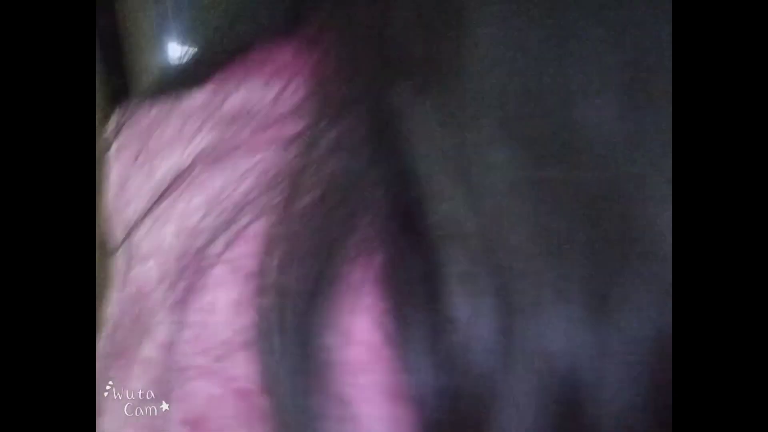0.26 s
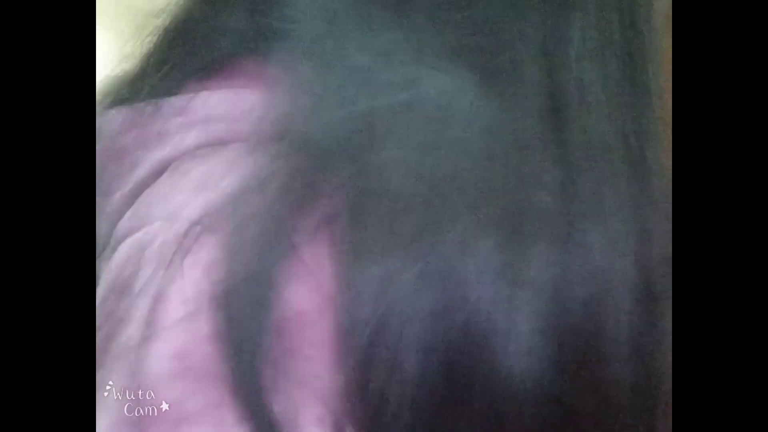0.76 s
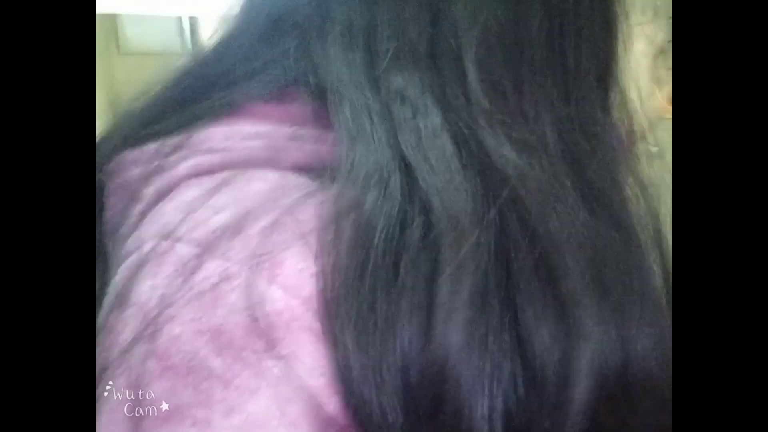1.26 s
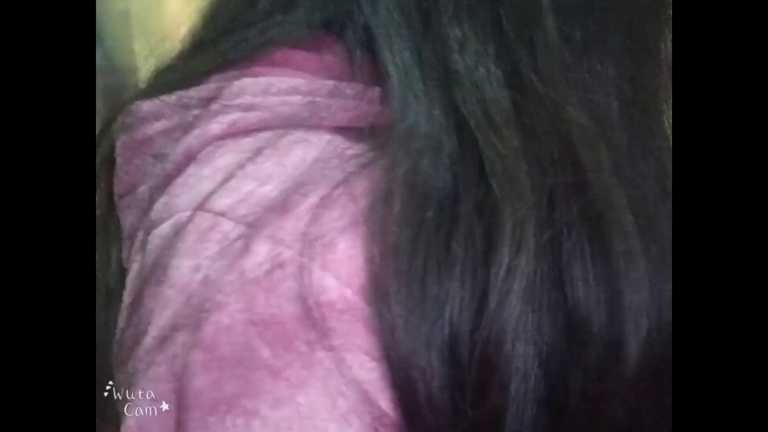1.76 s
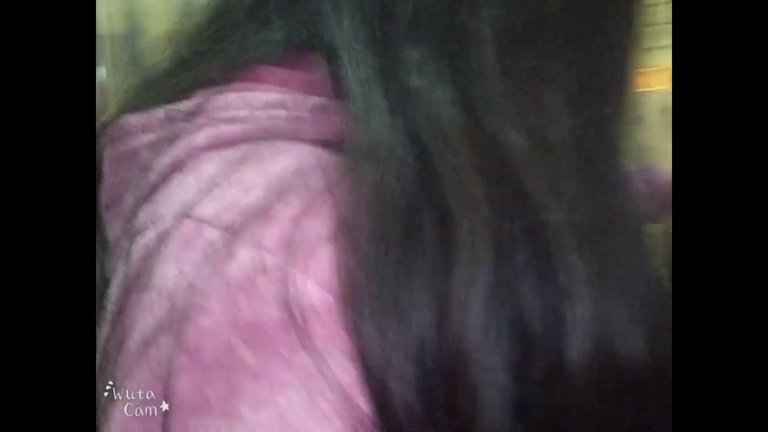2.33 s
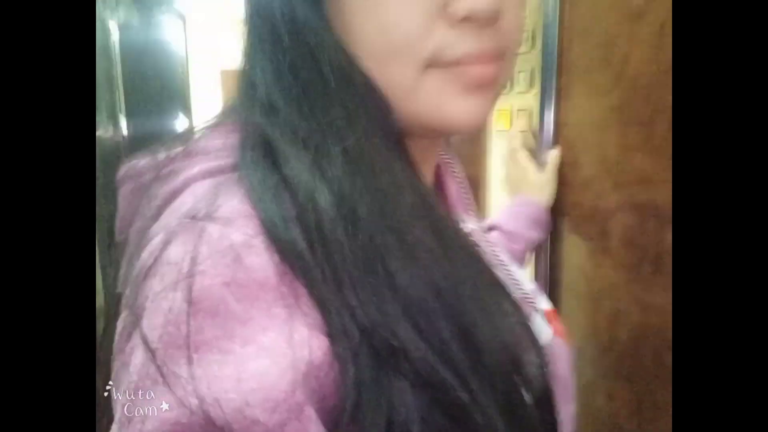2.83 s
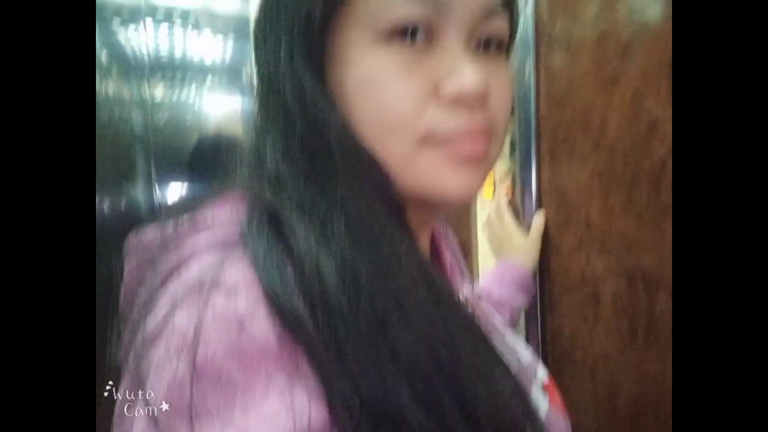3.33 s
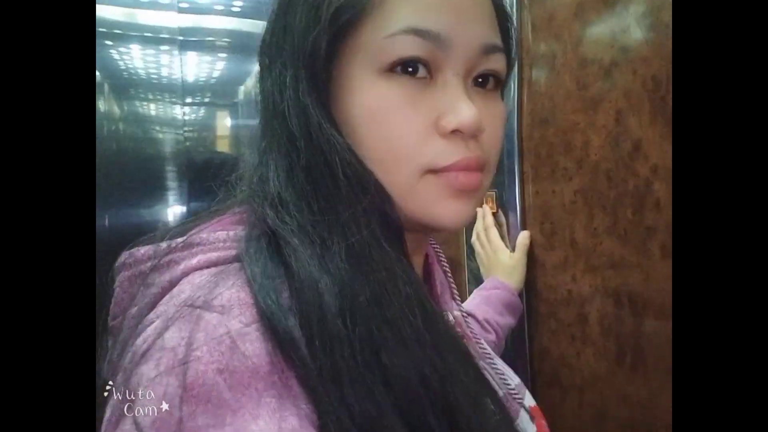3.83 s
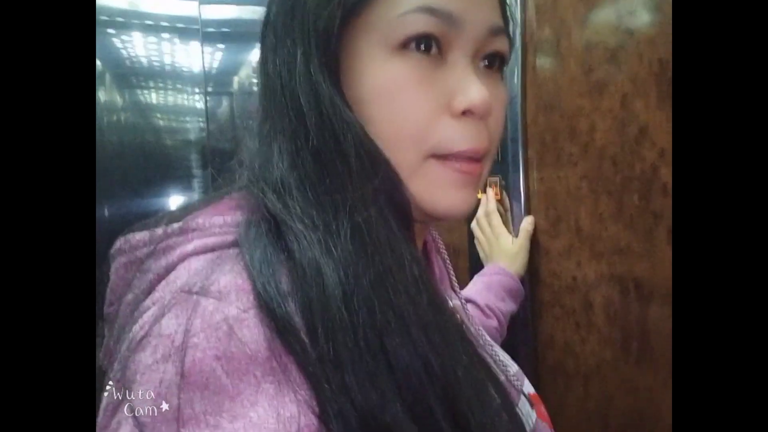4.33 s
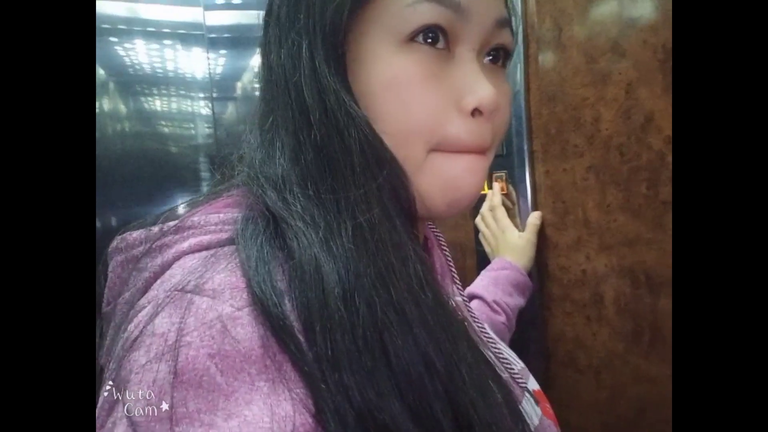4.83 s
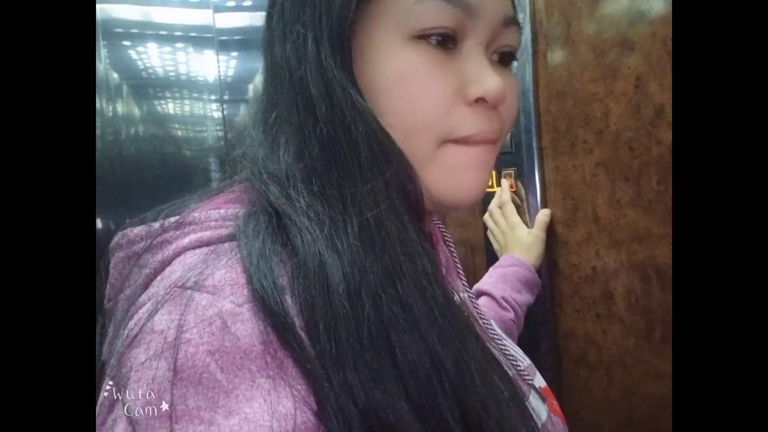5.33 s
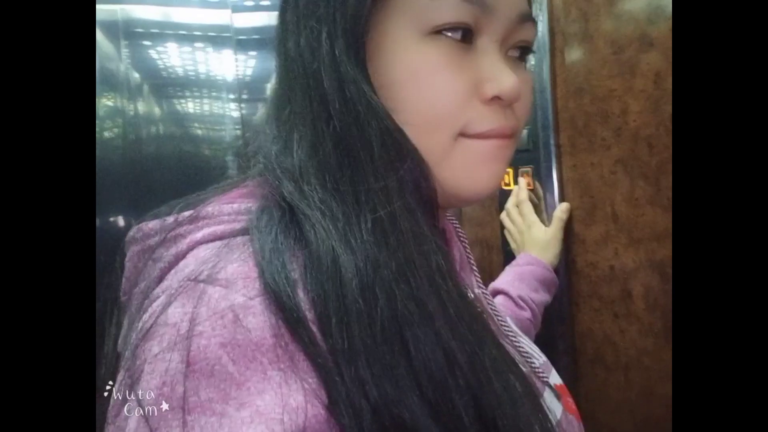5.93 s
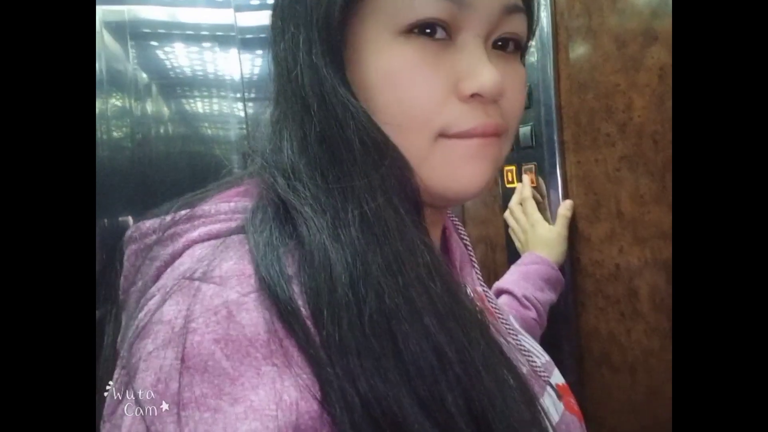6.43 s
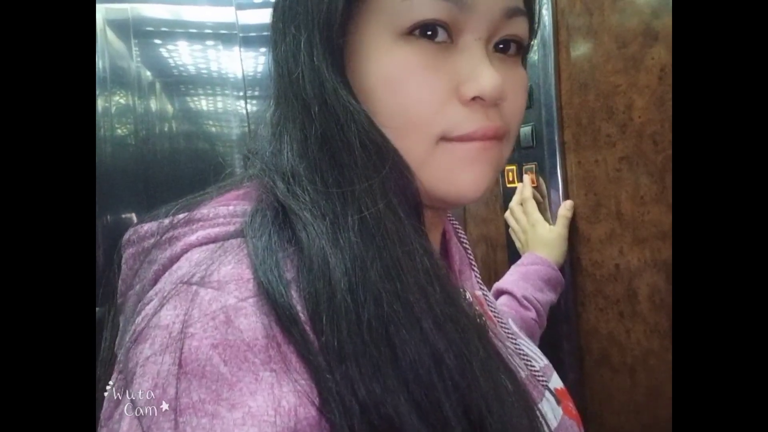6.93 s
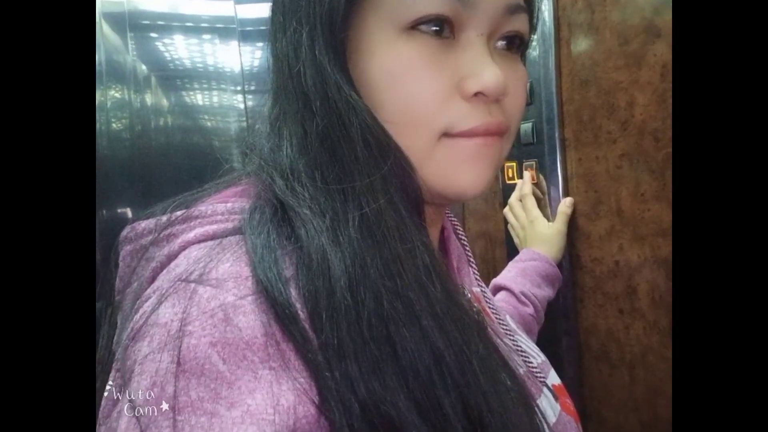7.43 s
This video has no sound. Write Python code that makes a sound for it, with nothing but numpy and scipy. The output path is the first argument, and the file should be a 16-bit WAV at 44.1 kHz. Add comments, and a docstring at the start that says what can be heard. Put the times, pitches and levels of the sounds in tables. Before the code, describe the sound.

A hand-held phone inside a small steel lift car picks up a steady low hum and a pitched fan drone with blown air, slightly muffled at first and clearer after about 2 to 3.5 seconds. From 0 to 2 seconds, fine clothing rustle sits close to the microphone, with short surges of air, scuffs and clicks; boomy knocks ring the wall panels at about 0.2, 0.65, 1.27 and, as a sharp double, 1.76 to 1.82. A light tap follows at 2.15. Shaft air rushes and swells, peaking near 3.5, with small clicks around 3.4 to 3.7, a soft low thud near 4 and scuffs at 4.3. At 4.73, 4.91 and 5.06 three juddering scrapes shove along the car, groaning and gritty, the last brightly hissing and leaving hollow resonance. By 6 the rush has faded; hum and fan continue, with a faint deep knock at 6.95, until about 7.7.

```python
"""A mains hum and a seven-blade ceiling fan drone inside a small steel lift car, through a hand-held phone.
Shaped noise makes the shaft air rush and surge and clothing rustle; short noise bursts click and tap,
and decaying sines knock and boom. Near five seconds layered friction noise scrapes along the car in three
shoves, the last with a bright hiss; then hum and fan carry on, with one last faint knock."""
import sys
import numpy as np
from scipy import signal
from scipy.fft import rfft, irfft, next_fast_len
from scipy.io import wavfile
from scipy.ndimage import uniform_filter1d, minimum_filter1d

SR = 44100
rng = np.random.default_rng(int(sys.argv[2]) if len(sys.argv) > 2 else 0)


def master(y):
    """Save y as 16-bit WAV."""
    cut = np.clip(np.atleast_2d(y).T, -1, 1)
    pcm = np.round(cut * 32767)  # scale
    wavfile.write(sys.argv[1], SR, pcm.astype(np.int16))


N = 338247
T = np.arange(N) / SR  # time in s

# All source levels are ahead of the phone's gain; colour tables give relative noise density.
# mains hum level over time: time_s, level_db
HUM_LEVEL = [(0.0, -33), (0.15, -39.5), (1.83, -27.5), (2.6, -33), (3.87, -28.5), (5.26, -33),
             (7.67, -31.5)]
# steady fan lines: multiple_of_shaft_rate, level_db
FAN_LINES = [(4, -51), (6, -40.5), (8, -61), (12, -57), (21, -65.5), (27, -63.5)]
# level of the blade tone's octave over time: time_s, level_db
OCTAVE_LEVEL = [(0.0, -67), (0.66, -65), (0.81, -46.5), (2.16, -62), (3.5, -45), (4.34, -46.5), (4.76, -41),
                (5.98, -42.5), (7.67, -42)]
# air blown by the fan, with the phone's treble hole near 10 kHz: freq_hz, density_db (per Hz)
FAN_AIR_COLOUR = [(30, 0.5), (48, 8.5), (70, 6), (130, -2.5), (205, -2), (400, -2), (680, -9),
                  (1050, -10.5), (1800, -16), (2200, -18), (4400, -22), (7000, -31), (10000, -59),
                  (15000, -25.5)]
# whirr of the fan: freq_hz, density_db (per Hz)
WHIRR_COLOUR = [(150, -45), (400, -2), (520, 2.5), (660, 4.5), (800, -3.5), (1080, 0), (1400, -40),
                (3000, -25), (8000, -41.5)]
# air resonances of the car: centre_hz, width_hz, lift_db
CAR_RESONANCES = [(94.3, 37, 6.5), (165, 23, 11), (255, 28, 6), (296.4, 19.7, 12), (445, 35, 1),
                  (665, 24, 4.5), (874, 12.7, 10.5), (954, 18, 5), (1146, 8.6, 8.5), (1600, 28, 4),
                  (1790, 67, -8.5), (2245, 210, 5.5), (2480, 95, 2.5), (3430, 510, 2.5), (4250, 200, 3)]
# surges of air in the shaft: peak_s, level_db, fall_s (time to fall by 1/e)
SURGES = [(.03, -34, 0.11), (.24, -37.5, 0.11), (.67, -30.5, 0.11), (2.1, -41, 0.21), (3.12, -27, 0.31),
          (3.541, -23, 0.27), (3.91, -28.5, 0.14), (4.31, -29.5, .12), (5.02, -27.5, 0.2)]
# rush of shaft air: freq_hz, density_db (per Hz)
RUSH_COLOUR = [(30, -30), (65, 4.5), (150, 0), (205, -8), (330, -1), (470, 0), (680, -4), (850, -10.5),
               (1200, -16), (1900, -27), (4000, -40.5), (8000, -47), (15000, -41)]
# low shake of the car in the air: freq_hz, density_db (per Hz)
BUFFET_COLOUR = [(25, -23), (45, -4), (65, 3), (90, -1), (140, -20), (400, -69)]
# rustle levels either side of a brief dip by the phone's noise suppression:
# start_s, end_s, start_level_db, trend_db_per_s
RUSTLE_LEVELS = [(0, 1.65, -48.5, -4.5), (1.78, 5.1, -55.5, 0.5)]
# clothing rustle: freq_hz, density_db (per Hz)
RUSTLE_COLOUR = [(200, -21), (1500, 11.5), (5000, -1.5), (6800, -0.5), (8200, -4.5), (11000, -0.5),
                 (13000, 4.5), (15000, 3)]
# clicks and scuffs: start_s, clack_db, tick_db, rise_s
CLICKS = [(.04, -37, -42.5, 0.0064), (.58, -32, -42.5, 0.012), (0.673, -29, -54, 0.0076),
          (.845, -44, -43.5, 0.017), (1.19, -35, -47.5, .018), (1.264, -28, -44, 0.0038),
          (1.53, -52, -45, 0.013), (1.758, -23.5, -37, 0.0018), (1.8126, -22, -33, 0.0005),
          (1.82, -21, -38, 0.0017), (2.115, -40, -48, 0.0045), (2.147, -36, -40.5, 0.0045),
          (3.35, -50, -45, 0.0055), (3.422, -48, -43.5, 0.01), (3.551, -32, -38.5, .012),
          (3.668, -33, -40.5, .015), (4.262, -44, -45, 0.01), (4.37, -38, -46.5, 0.021),
          (4.745, -38, -50, 0.0015), (4.8, -36, -37, 0.0069), (5.065, -30, -46, 0.0017)]
# mid clack: freq_hz, density_db (per Hz)
CLACK_COLOUR = [(150, 15.5), (600, 7.5), (1200, 4), (1700, 1), (2300, 0), (3500, -7.5), (6500, -16),
                (9000, -38), (15000, -47)]
# bright tick: freq_hz, density_db (per Hz)
TICK_COLOUR = [(1000, -12), (3000, -5), (6000, 2), (8200, -5.5), (12000, -0.5), (15000, 1)]
# knocks, and booms of the car rung by the last scrape, levels before rise and decay:
# start_s, boom_db, boom_hz, boom_t60_s, ring_db
KNOCKS = [(0.159, -7, 73, 0.12, -53), (0.245, -3, 70.5, 0.13, -32), (0.641, -9, 88.3, 0.34, -38),
          (.678, -16.5, 58.7, 0.52, -25), (1.2671, 5, 92, 0.23, -17), (1.757, 0, 90.3, 0.23, -13.5),
          (1.815, -3.5, 83, 0.28, -15), (2.031, -19, 63, .33, -44), (3.986, -10.5, 85, 0.16, -48),
          (4.74, -8, 82, 0.43, -32), (5.075, -8.5, 236.3, 0.61, -36), (5.111, -8, 162.7, 0.33, -21),
          (5.14, -6.5, 290.4, 0.32, -38), (6.95, -29, 47.6, .55, -61)]
# wall panel modes before detuning: mode_hz, level_db (relative), t60_s
PANEL_MODES = [(157, 0, 0.27), (234, -2.5, 0.11), (253, -2.5, 0.19), (325.6, -7.5, 0.17),
               (416.6, -7.5, 0.158), (480, -25, 0.067), (638, -23, 0.13), (777, -20, 0.35),
               (948, -25, 0.22), (1055, -20, 0.14)]
# small taps, squeaks, and car resonances rung by the last scrape:
# start_s, centre_hz, width_hz, level_db, t60_s
TAPS = [(0.68, 2220, 700, -37.5, 0.21), (1.813, 1890, 1590, -26, 0.06), (1.822, 1120, 200, -30, 0.14),
        (2.152, 1400, 400, -34, 0.11), (4.806, 8300, 200, -47, .2), (4.924, 6300, 350, -44, .3),
        (5.09, 846, 90, -26, 0.5), (5.108, 505, 60, -23.5, 0.52)]
# scrapes: start_s, rise_s, hold_s, body_t60_s, body_db, grit_db, hiss_db, groan_db
SCRAPES = [(4.731, 0.017, 0.091, 0.55, -20.5, -38, -64, -33.5),
           (4.906, 0.034, 0.033, 0.66, -21, -39.5, -52.5, -67),
           (5.064, 0.021, 0.046, 0.28, -22, -35, -31, -33)]
# body of the scrape: freq_hz, density_db (per Hz)
SCRAPE_COLOUR = [(35, 1), (110, 7), (205, -2.5), (320, 4), (520, -2.5), (700, -7), (870, -10.5),
                 (1400, -21), (3000, -60), (8000, -63)]
# grit of the scrape: freq_hz, density_db (per Hz)
GRIT_COLOUR = [(700, 10.5), (1750, 2), (2250, 4.5), (3500, 0.5), (6000, 1.5), (8000, -7), (11000, -6.5),
               (15000, -3.5)]
# hiss of bare metal: freq_hz, density_db (per Hz)
HISS_COLOUR = [(3000, -21), (6200, -24), (7200, -2.5), (7900, -4), (8900, -1.5), (9700, -0.5), (10800, -7),
               (15000, -19)]
# thin metal rings in the hiss: centre_hz, width_hz, lift_db
METAL_RINGS = [(6970, 160, 6), (8800, 60, 10), (8900, 60, 4), (9100, 80, 12), (9384, 60, 1), (9600, 70, 11)]

HUM_HZ, SHAFT_HZ = 100.0, 42.54
# fan levels in the open
BLADE_DB, AIR_DB, WHIRR_DB = -36.5, -36, -43.5
# a body screens the fan until the phone swings clear: middle and length of the swing, then the losses
CLEAR_S, SWING_S = 2.76, 1.9
BLADE_SCREEN_DB, WHIRR_SCREEN_DB, AIR_SCREEN_DB = -6.5, -10, -0.47
BUFFET_DB = -32  # at the strongest moment of the rush
RUSTLE_T60_S, RUSTLE_PATCHY_DB, RUSTLE_PATCH_RATE = 0.4, 0.9, 8.3  # fade, level spread, changes per s
# a softer contact dies more slowly: t60 of a hard click, extra t60 per second of rise
CLICK_T60_S, CLICK_LINGER = 0.047, 5.1
BOOM_RISE_S, RING_RISE_S = 0.03, 0.0083
# phone gain: threshold, dB of cut per dB over it
GAIN_THRESHOLD_DB, GAIN_SLOPE = -27, 0.21
# phone gain timing: hold, fall of the held level (dB per s), averaging time
GAIN_HOLD_S, GAIN_RELEASE_DB_S, GAIN_WINDOW_S = 0.88, 10, 0.022
BASS_CUT_HZ, TOP_HZ = 33, 15500


def undb(db):
    """Decibels to gain."""
    return 10 ** (np.asarray(db) / 20)


def unit(x):
    """Scale to rms 1."""
    return x / np.sqrt(np.mean(x ** 2))


def curve(rows):
    """Gain over time from a table of time_s, level_db."""
    return undb(np.interp(T, *np.transpose(rows)))


def walk(rate):
    """Smooth random drift of rms 1, with rate new values per second."""
    step = int(SR / rate)
    steps = np.repeat(rng.standard_normal(N // step + 1), step)
    smooth = uniform_filter1d(uniform_filter1d(steps, step), step)
    return unit(smooth[:N])


def decay(t, t60):
    """Exponential decay by 60 dB in t60 seconds."""
    return np.exp(-np.log(1000) * t / t60)


def fade(start, t60):
    """Level 1 until start, then an exponential decay, cut off after two t60."""
    return decay(np.clip(T - start, 0, 2 * t60), t60) * (T < start + 2 * t60)


def attack(start, rise):
    """Straight rise from 0 to 1."""
    return np.clip((T - start) / rise, 0, 1)


def colour(x, points, peaks=()):
    """Give x a smooth spectrum with resonances on top; rms 1."""
    f = np.maximum(np.arange(N + 1) * SR / (2 * N), 1)
    hz, db = np.transpose(points)
    shape_db = np.interp(np.log(f), np.log(hz), db)
    for centre, width, lift in peaks:
        shape_db = shape_db + lift / (1 + (2 * (f - centre) / width) ** 2)
    size = next_fast_len(N, real=True)
    bins_hz = np.arange(size // 2 + 1) * SR / size
    gain = np.interp(bins_hz, f, undb(shape_db))
    return unit(irfft(rfft(x, size) * gain, size)[:N])


def noise():
    """White noise."""
    return rng.standard_normal(N)


def grains(rate, spread_db):
    """Friction: noise that catches and slips many times a second."""
    return noise() * undb(spread_db * walk(rate))


def tone(hz, waver, flutter_db):
    """A line whose phase (waver in radians) and level drift as the reflections in the car shift."""
    phase = 2 * np.pi * hz * T + waver * walk(3.12)
    return np.sqrt(2) * np.sin(phase) * undb(flutter_db * walk(9))


def cabin(x, wet_db, t60):
    """Add dense early reflections between close steel walls, as a decaying noise tail."""
    t = T[:SR // 2]
    tail = rng.standard_normal(len(t)) * decay(t, t60) * np.minimum(t / 0.0032, 1)
    tail = tail / np.sqrt(np.sum(tail ** 2))
    return x + undb(wet_db) * signal.fftconvolve(x, tail)[:N]


def hum():
    """Iron buzzing at twice the mains frequency, its level drifting."""
    return curve(HUM_LEVEL) * tone(HUM_HZ, waver=0.088, flutter_db=0.5)


def fan():
    """Blade tone and octave, weaker shaft lines, and blown air that whirrs and rings the car."""
    blade_hz = 7 * SHAFT_HZ  # seven blades pass per turn
    screened = np.clip(0.5 - (T - CLEAR_S) / SWING_S, 0, 1)
    blade_level = undb(BLADE_DB + BLADE_SCREEN_DB * screened)
    air_level = undb(AIR_DB + AIR_SCREEN_DB * screened)
    whirr_level = undb(WHIRR_DB + WHIRR_SCREEN_DB * screened)

    blades = blade_level * tone(blade_hz, waver=0.45, flutter_db=0.5)
    octave = curve(OCTAVE_LEVEL) * tone(2 * blade_hz, waver=0.3, flutter_db=2.0)
    lines = sum(undb(db) * tone(k * SHAFT_HZ, waver=0.32, flutter_db=2.5) for k, db in FAN_LINES)
    blown = colour(cabin(noise(), wet_db=-6.5, t60=0.24), FAN_AIR_COLOUR, CAR_RESONANCES)
    air = blown * undb(1.07 * walk(5.2))
    whirr = colour(grains(40, spread_db=0.6), WHIRR_COLOUR, CAR_RESONANCES)
    return blades + octave + lines + air_level * air + whirr_level * whirr


def airflow():
    """Strength of the rush: each surge grows and dies at the same rate, and their powers add."""
    surges = [undb(db) * np.exp(-np.abs(T - peak) / fall) for peak, db, fall in SURGES]
    return np.sqrt(sum(surge ** 2 for surge in surges))


def shaft():
    """Air and guide shoes rush along the shaft, swell midway and die away after the scrapes."""
    return colour(grains(45, spread_db=1.2), RUSH_COLOUR, CAR_RESONANCES) * airflow()


def buffeting():
    """Air squeezed past the car shakes it; this grows faster than the rush itself."""
    rush = airflow()
    strength = (rush / rush.max()) ** 1.3
    return undb(BUFFET_DB) * colour(noise(), BUFFET_COLOUR) * strength


def clothing():
    """A soft, fine and patchy rustle close to the microphone, briefly ducked by the phone."""
    level = 0
    for start, end, db, trend in RUSTLE_LEVELS:
        level = level + (T >= start) * undb(db + trend * (T - start)) * fade(end, RUSTLE_T60_S)
    patches = undb(RUSTLE_PATCHY_DB * walk(RUSTLE_PATCH_RATE))
    return colour(grains(110, spread_db=1.6), RUSTLE_COLOUR) * level * patches


def clicks():
    """Loose fittings chatter or scuff: a mid clack and a bright tick that rise and die together."""
    clack_level, tick_level = 0, 0
    for start, clack_db, tick_db, rise in CLICKS:
        shape = attack(start, rise) * fade(start + rise, CLICK_T60_S + CLICK_LINGER * rise)
        clack_level = clack_level + undb(clack_db) * shape
        tick_level = tick_level + undb(tick_db) * shape
    clack = clack_level * colour(grains(700, spread_db=1.0), CLACK_COLOUR)
    tick = tick_level * colour(grains(900, spread_db=1.5), TICK_COLOUR)
    return cabin(clack + tick, wet_db=0.0, t60=0.24)


def knocks():
    """Each knock or shove swells into a boom of the car's shell and rings the wall panels."""
    out = np.zeros(N + SR)
    t = T[:SR]
    # each row finds each panel mode slightly off its nominal pitch
    detune = 1 + 0.019 * rng.standard_normal((len(KNOCKS), len(PANEL_MODES)))
    for (start_s, boom_db, boom_hz, t60, ring_db), ratios in zip(KNOCKS, detune):
        boom = np.sin(2 * np.pi * boom_hz * t) * (1 - np.exp(-t / BOOM_RISE_S)) * decay(t, t60)
        ring = 0
        for k, (mode_hz, db, mode_t60) in enumerate(PANEL_MODES):
            mode = np.sin(2 * np.pi * mode_hz * ratios[k] * t) * decay(t, mode_t60)
            ring = ring + (-1) ** k * undb(db) * mode  # neighbours start in opposite directions
        ring = ring * (1 - np.exp(-t / RING_RISE_S))
        start = int(start_s * SR)
        out[start:start + SR] += undb(boom_db) * boom + undb(ring_db) * ring
    return out[:N]


def taps():
    """Small taps, squeaks, and car resonances rung by the last scrape, each one narrow band of noise."""
    out = 0
    for start, hz, width, db, t60 in TAPS:
        edges = [hz - width / 2, hz + width / 2]
        band = signal.butter(2, edges, "bandpass", fs=SR, output="sos")
        ring = unit(signal.sosfilt(band, noise()))
        out = out + undb(db) * ring * attack(start, 0.0019) * fade(start, t60)
    return out


def scrapes():
    """Sliding contact judders the car; it groans, grits, and hisses where bare metal rubs."""
    body = colour(grains(90, spread_db=1.3), SCRAPE_COLOUR, CAR_RESONANCES)
    grit = colour(grains(200, spread_db=1.5), GRIT_COLOUR)
    hiss = colour(grains(150, spread_db=-1.5), HISS_COLOUR, METAL_RINGS)
    groan = tone(596, waver=0.27, flutter_db=-1.0)
    out = 0
    for start, rise, hold, t60, body_db, grit_db, hiss_db, groan_db in SCRAPES:
        tail = fade(start + rise + hold, t60)
        low = undb(body_db) * body + undb(groan_db) * groan
        treble = undb(grit_db) * grit + undb(hiss_db) * hiss
        # the treble dies sooner than the body
        out = out + attack(start, rise) * (tail * low + tail ** 1.31 * treble)
    return out


def gain_control(x):
    """Loud moments quickly turn the gain down; it stays there a while, then creeps back."""
    keep = np.exp(-1 / (GAIN_WINDOW_S * SR))
    power = signal.lfilter([1 - keep], [1, -keep], x ** 2)
    level_db = 10 * np.log10(power + 1e-12)
    # hold the loudest level of the recent past
    hold = int(GAIN_HOLD_S * SR)
    peak_db = -minimum_filter1d(-level_db, hold, origin=(hold - 1) // 2, mode="nearest")
    # then let it fall at a steady rate
    fall_db = GAIN_RELEASE_DB_S * T
    held_db = np.maximum.accumulate(peak_db + fall_db, axis=-1) - fall_db
    return x * undb(-GAIN_SLOPE * np.maximum(held_db - GAIN_THRESHOLD_DB, 0))


def scene():
    """All sources at one microphone."""
    steady = hum() + fan()
    moving_air = shaft() + buffeting()
    contacts = clothing() + clicks() + knocks() + taps() + scrapes()
    return (steady + moving_air + contacts)[None]


def record(dry):
    """The phone drops the deepest bass, rides its gain and cuts the top."""
    bass_cut = signal.butter(4, BASS_CUT_HZ, "highpass", fs=SR, output="sos")
    top_cut = signal.ellip(10, 0.2, 80, TOP_HZ, fs=SR, output="sos")
    return signal.sosfilt(top_cut, gain_control(signal.sosfilt(bass_cut, dry)))


dry = scene()
out = record(dry)
master(out)
```